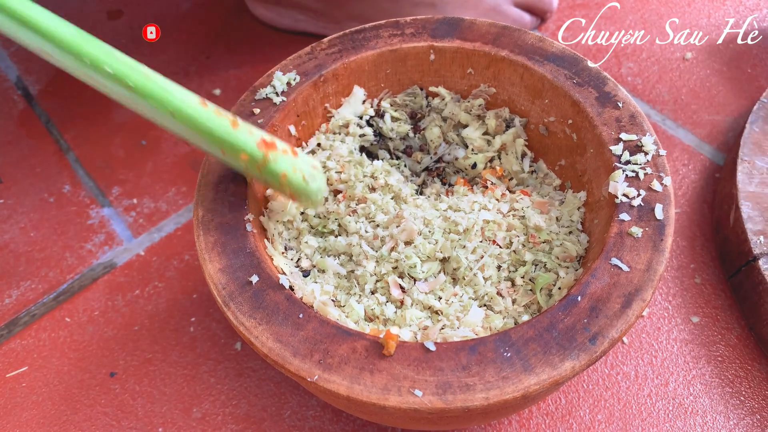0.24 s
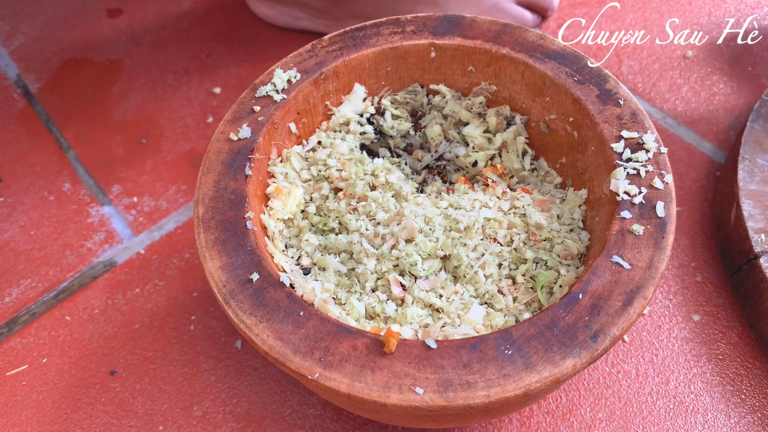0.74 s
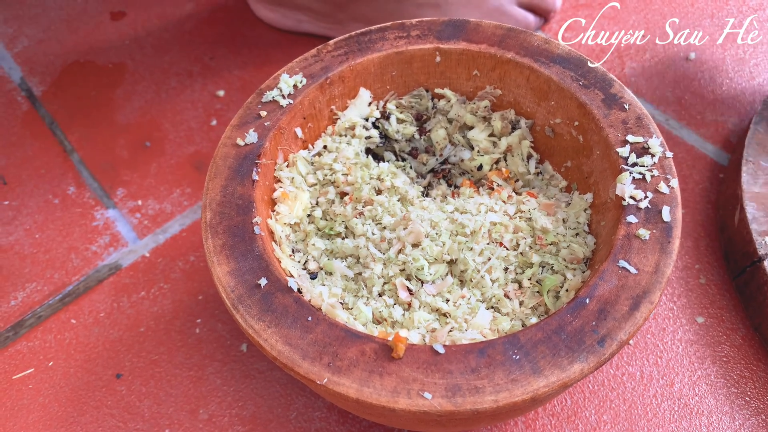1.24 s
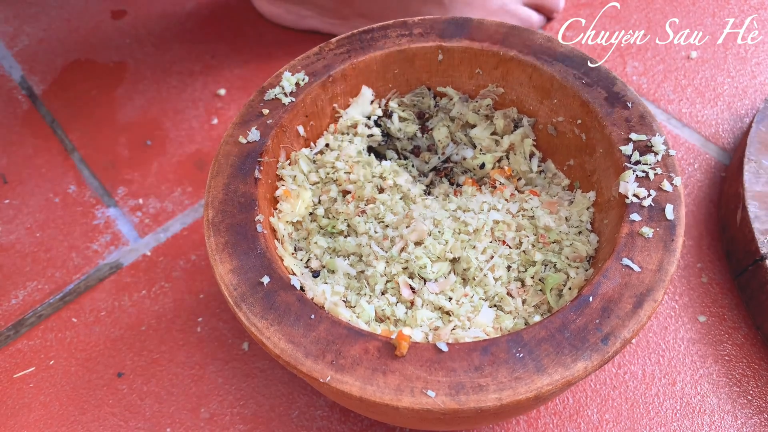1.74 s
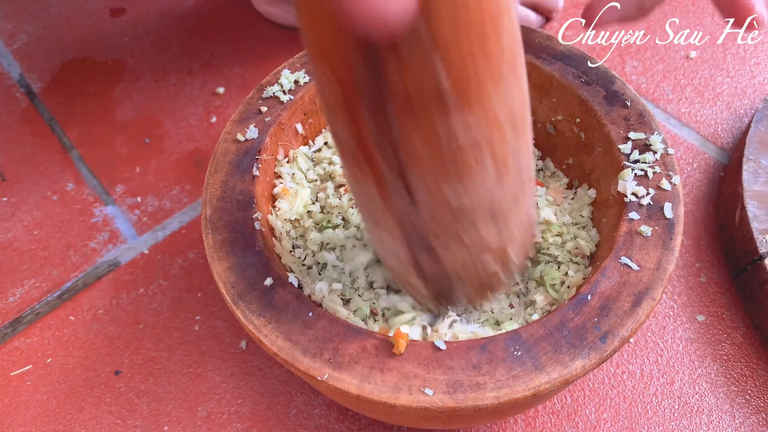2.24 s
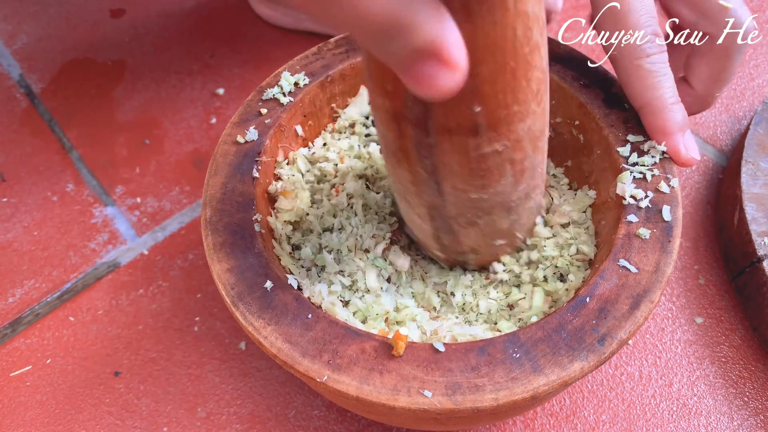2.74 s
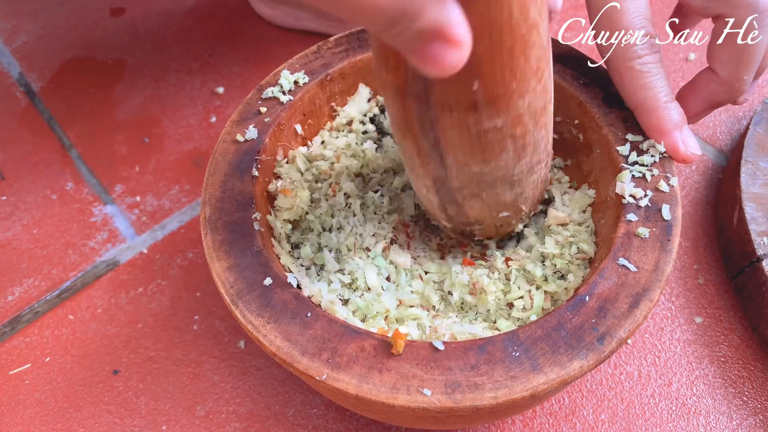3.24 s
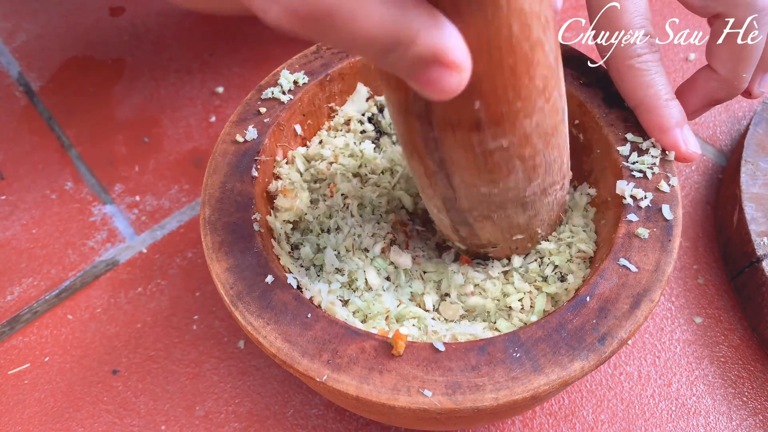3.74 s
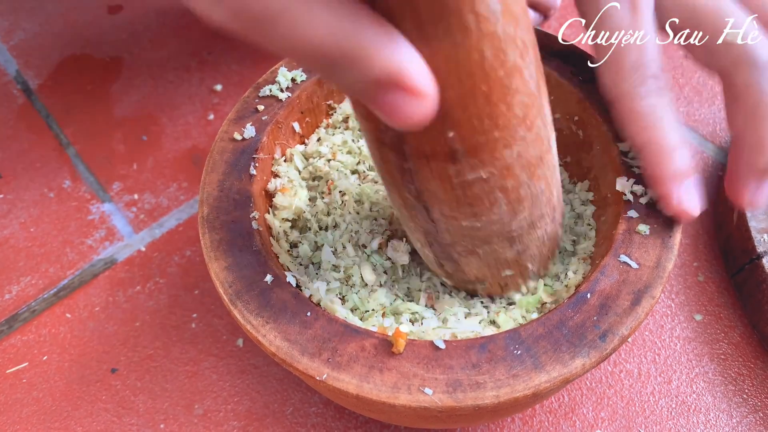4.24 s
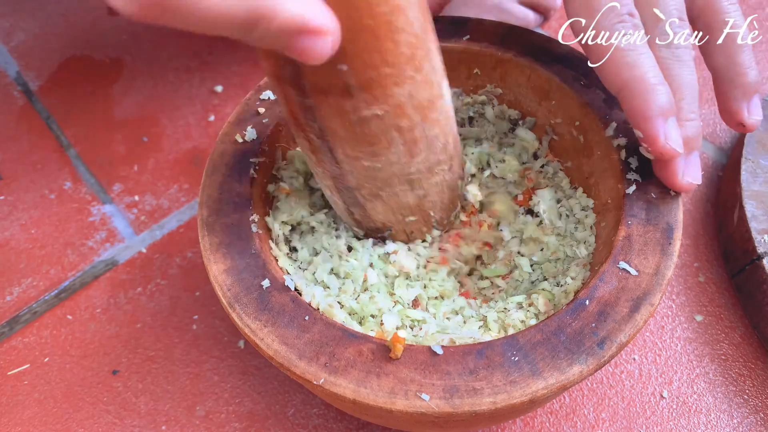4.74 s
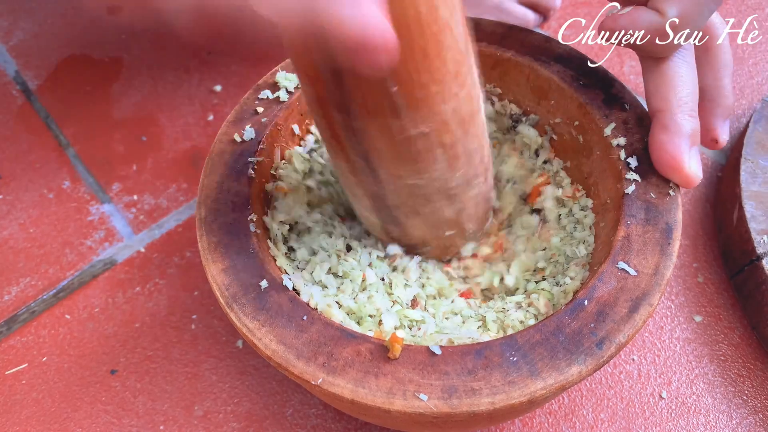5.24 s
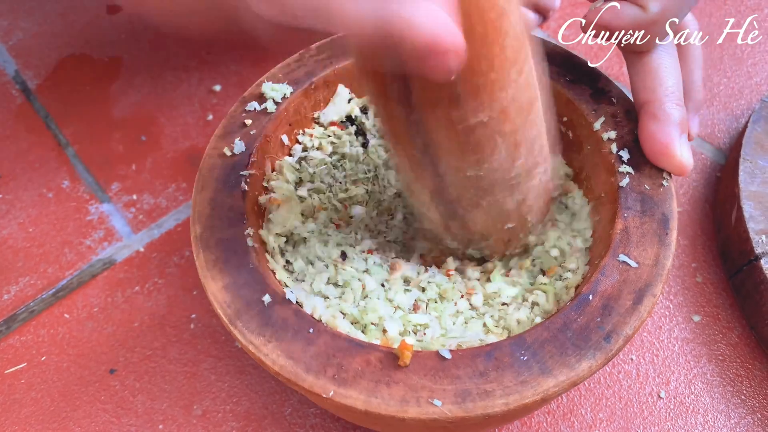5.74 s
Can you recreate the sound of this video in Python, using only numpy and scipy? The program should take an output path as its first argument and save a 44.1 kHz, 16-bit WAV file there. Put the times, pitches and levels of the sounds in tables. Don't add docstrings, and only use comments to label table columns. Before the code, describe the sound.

Moist, gritty pestle crunches about four times a second follow a small plastic clatter and board knock, with a few hard wooden knocks and faint insect whine.

```python
import sys
import numpy as np
from scipy import signal
from scipy.fft import rfft, irfft, next_fast_len
from scipy.io import wavfile
from scipy.ndimage import map_coordinates

SR = 44100
rng = np.random.default_rng(int(sys.argv[2]) if len(sys.argv) > 2 else 0)


def log_audio(samples):
    frames = np.atleast_2d(samples).T
    limited = np.clip(frames, -1, 1)
    pcm = np.round(limited * 32767).astype(np.int16)
    wavfile.write(sys.argv[1], SR, pcm)


def voltage_ratio(level):
    return 10 ** (np.asarray(level, float) / 20)


N = 263409

# peak_s, length_s, crackle_db, fizz_db
PEELS = [(0.211, 0.1, -54.5, -66.5), (0.407, 0.18, -53.5, -59), (0.686, 0.19, -55, -72.5),
         (0.907, .06, -64.5, -83), (0.974, 0.041, -58, -65), (1.119, 0.038, -80, -88),
         (1.416, 0.03, -39, -66.5), (1.449, 0.061, -50.5, -77), (1.542, 0.033, -83.5, -72),
         (1.71, 0.037, -83, -68), (1.801, 0.075, -48, -67), (1.943, 0.041, -71, -80),
         (2.226, 0.029, -73, -72.5), (2.475, 0.096, -53, -67), (2.547, 0.056, -56, -62),
         (2.63, 0.057, -49.5, -78.5), (2.78, 0.096, -48, -68), (2.906, 0.09, -52.5, -68),
         (3.048, 0.078, -61, -71.5), (4.064, 0.078, -38.5, -59.5), (4.705, 0.09, -34.5, -57),
         (4.835, 0.1374, -54, -69), (4.984, 0.086, -56, -79.5), (5.079, 0.067, -45, -68),
         (5.233, 0.048, -38, -75), (5.313, 0.075, -53.5, -72), (5.488, 0.056, -39, -73.5),
         (5.58, 0.063, -55.5, -73.5), (5.727, 0.067, -35.5, -69.5), (5.967, 0.092, -36.5, -62)]
# start_s, peak_db, centre_hz, squash_db, fizz_db
STROKES = [(1.4094, -35, 2600, 7, -35), (1.4286, -31, 2360, 7, -24), (1.4589, -25.5, 2540, -2, -37.5),
           (2.3058, -21.5, 3270, -3.5, -20), (2.5587, -32, 3040, 5, -14), (2.8135, -22, 2740, 6, -8),
           (2.9973, -46, 4230, -9, -19), (3.0754, -26, 4070, 13.5, -2), (3.3274, -24.5, 3300, 4.5, -8.5),
           (3.4112, -40, 3480, 3, -28), (3.585, -22, 3740, 4.5, -7.5), (3.839, -22, 3275, -2, -10.5),
           (4.0836, -31, 3600, 1.5, -36), (4.2443, -49.5, 3330, -20.5, -13.5),
           (4.324, -26.5, 2950, 9.5, -7.5), (4.5465, -56.5, 2380, 2, -15), (4.6004, -22, 2260, 2.5, -25),
           (4.8871, -29.5, 2660, 4.5, -20.5), (5.1425, -24.5, 3370, 0.5, -11), (5.4005, -27, 2700, 8, -22),
           (5.6491, -22, 3580, 10.5, -8), (5.8992, -17.5, 3190, 0, -12)]


def unit(x):
    return x / np.sqrt(np.mean(x ** 2) + 1e-20)


def curves(rows):
    s, *cols = np.transpose(rows)
    return [np.interp(np.arange(N) / SR, s, c) for c in cols]


def wobble(rate):
    knots = rng.standard_normal(int(N * rate / SR) + 4)
    return map_coordinates(knots, [np.arange(N) * rate / SR])


def filtered(x, response):
    m = next_fast_len(len(x) + 8192)
    return irfft(rfft(x, m) * response(np.fft.rfftfreq(m, 1 / SR)), m)[:len(x)]


def mode(f, hz, width):
    return 1j * f * width / (hz * hz - f * f + 1j * f * width)


def modal_sum(f, modes, gains):
    return sum((-1) ** k * gains[k] * mode(f, hz, width) for k, (hz, width, _) in enumerate(modes))


def add(track, s, sound):
    part = track[round(s * SR):][:len(sound)]
    part += sound[:len(part)]


def roomed(sound, wet_db, t60):
    t = np.arange(len(sound)) / SR
    noise = rng.standard_normal(len(t))
    low = filtered(noise, lambda f: 1 / (1 + (f / 2200) ** 4))
    decay = voltage_ratio(-60 * t / t60)
    tail = low * decay + (noise - low) * voltage_ratio(-60 * t / (0.98 * t60))
    tail = tail * (1 - np.exp(-t / 0.0015))
    return sound + voltage_ratio(wet_db) * signal.fftconvolve(sound, tail / np.linalg.norm(decay))[:len(t)]


def grit(size, spiky_db):
    noise = rng.standard_normal(size)
    grains = rng.standard_normal(size // 8 + 1).repeat(8)[:size]
    return unit(noise * voltage_ratio(np.clip(spiky_db, 0, 7) * grains))


def room_tone():
    # pitch_hz, level_db (per Hz)
    air_spectrum = [(125, -9.5), (160, -30.5), (229, -2.5), (317, -5), (449, -5), (950, -8.5), (2090, -19),
                    (3130, -16.5), (5260, -20.5), (6300, -15), (7200, -14.5), (9000, -21), (11000, -30),
                    (13500, -32.5), (14800, -45.5)]
    # pitch_hz, level_db
    hum_tones = [(401, -65.5), (287, -79)]
    air_hz, air_db = np.transpose(air_spectrum)
    noise = rng.standard_normal(N) * voltage_ratio(1.1 * wobble(10.0))
    air = filtered(noise, lambda f: voltage_ratio(np.interp(np.log(f + 1), np.log(air_hz), air_db)))
    t = np.arange(N) / SR
    hum = np.zeros(N)
    for hz, db in hum_tones:
        hum += voltage_ratio(db - 1.5 + 1.3 * wobble(8.9)) * np.sin(2 * np.pi * hz * t + 0.51 * wobble(1.1))
    return voltage_ratio(-59.5) * unit(air) + hum


def insect():
    # start_s, tenth_overtone_db, lean_db (of its neighbours towards the lower one)
    song = [(0.05, -64.5, 3), (.5, -69, 8), (.7, -62, 11), (.95, -76, -1), (1.4, -69, 9), (1.85, -76, 2),
            (2.38, -65.5, -5), (2.43, -51, 1), (2.49, -65.5, 0), (2.9, -69.5, 1.5), (3.13, -63.5, -1),
            (3.8, -75.5, 1), (4.2, -58.5, 3), (4.46, -48.5, 0.5), (4.56, -55.5, 2), (4.63, -69, 4),
            (5.1, -64.5, 3.5), (5.6, -73, 6.5)]
    # start_s, four_click_db, two_click_db
    unevenness = [(0, -71, -79), (.7, -74, -79.5), (1.1, -71, -75), (1.72, -82, -77), (1.85, -78, -71.5),
                  (2.2, -100, -71.5), (2.5, -100, -102)]
    # pitch_hz, level_db
    wing = [(5300, -9.5), (5800, -5.5), (6100, 2), (6450, 1), (6750, -2.5), (7050, -3.5), (7500, -16)]
    # start_s, rate_hz
    click_rate = [(0, 624.6), (1, 624.5), (1.9, 623.6), (3, 625.4), (4.45, 627.8), (5.5, 628.7), (6, 628.8)]
    # centre_s, length_s, multiple (of the click rate), level_db
    standouts = [(.25, .5, 10.75, 5), (1.2, .55, 10.25, 9), (1.88, .22, 9.5, 6), (.05, .2, 9.5, 8),
                 (.9, .9, 11.25, 3)]
    t = np.arange(N) / SR
    tenth_db, lean_db = curves(song)
    flank_db, = curves([(0.98, -79), (1.96, -70)])
    ninth_db, eleventh_db = flank_db + lean_db, flank_db - lean_db
    four_db, two_db = curves(unevenness)
    depth, = curves([(1.75, .12), (1.9, .72)])
    depth = np.clip(depth - .022 * np.maximum(tenth_db + 63, 0), 0, .9)
    calm, = curves([(4.7, .85), (5.1, .25)])
    rate = curves(click_rate)[0]
    phase = 2 * np.pi * np.cumsum(rate + 0.24 * wobble(4.4)) / SR
    beat = 2 * np.pi * np.cumsum(27 + 1.2 * wobble(2.5)) / SR
    phase = phase + .11 * depth * np.sin(beat)

    def line(order, db):
        return voltage_ratio(db + wobble(6)) * np.sqrt(2) * np.sin(order * phase + rng.uniform(0, 2 * np.pi))

    def throb(share, lag):
        swing = share * depth
        return (1 + swing * np.sin(beat - lag)) / np.sqrt(1 + swing ** 2 / 2)

    out = line(9, ninth_db) * throb(calm, 1.2)
    out = out + line(10, tenth_db) * throb(.95, 1.6)
    out = out + line(11, eleventh_db) * throb(.9, 2.0)
    out = out + line(12, eleventh_db - 8) * throb(1.1, .8)
    wing_hz, wing_db = np.transpose(wing)
    for quarter in range(35, 48):
        if quarter % 4 == 0:
            continue
        colour_db = np.interp(quarter / 4 * rate[0], wing_hz, wing_db)
        for s, length, order, db in standouts:
            if order == quarter / 4:
                colour_db = colour_db + db * np.exp(-(2 * (t - s) / length) ** 4)
        uneven_db = four_db if quarter % 2 else two_db
        out = out + line(quarter / 4, colour_db + 2 * wobble(3) + uneven_db)
    return out


def stickiness():
    t = np.arange(N) / SR
    rest_db, spray_db = np.array([[-76], [-82]]), np.array([[-6.5], [-11]])
    gains = voltage_ratio(rest_db + np.array([3 * wobble(3.9), 5 * wobble(16)]))
    for s, length, crackle_db, fizz_db in PEELS:
        fall_db = 20 * (2 * (t - s) / length) ** 2
        gains = gains + voltage_ratio(np.array([[crackle_db], [fizz_db]]) - fall_db)
    for s, db, _, _, fizz_db in STROKES:
        u = np.maximum(t - s, 0)
        spray = (1 - np.exp(-u / 0.018)) * voltage_ratio(db + fizz_db - 60 * u / 0.15)
        gains = gains + voltage_ratio(spray_db) * spray
    return gains


def sticky():
    low_shares = [.3, .3, 0.55, 0.57, 0.77, 0.61, 0.72, .5, .5, 0.46, 0.24, 0.42, .5, .3, 0.69, .4, 0.19,
                  0.17, .5, .6, .75, 0.77, 0.71, 0.62, 0.67, 0.51, 0.61, 0.55, 0.65, .6]
    crackle_gain, fizz_gain = stickiness()
    bits = grit(N, 4.5) * voltage_ratio(2.2 * wobble(150))
    lean = curves([(row[0], share) for row, share in zip(PEELS, low_shares)])[0]
    lean = np.clip(lean, 0, 1)

    def zone(hz):
        return unit(filtered(bits, lambda f: mode(f, hz, 380) * mode(f, 8300, 1900) ** 3))

    low, high = zone(7850), zone(8800)
    fine = grit(N, 3) * voltage_ratio(9 * np.tanh(2 * wobble(220) + .5))
    fizz = unit(filtered(fine, lambda f: mode(f, 13300, 2300) ** 3))
    return voltage_ratio(-4.0) * crackle_gain * (lean * low + (1 - lean) * high) + fizz_gain * fizz


def thump(pitch_hz, cycles, t, order):
    u = t * pitch_hz / cycles
    push = -np.sin(2 * np.pi * pitch_hz * t) * (u * np.exp(1 - u)) ** 3
    top_hz = max(1480, 1.5 * pitch_hz)
    push = signal.sosfilt(signal.butter(5, top_hz, fs=SR, output="sos"), push)
    return filtered(push, lambda f: (1j * f / (270 + 1j * f)) ** order)


def thumps():
    # start_s, peak_db, pitch_hz, cycles, room_db
    dull_blows = [(0.11, -28.5, 620, 0.61, 0), (0.333, -32.5, 607, 0.53, 0.5), (0.353, -43, 710, 0.28, 4.5),
                  (0.964, -35.5, 296, 0.98, -6), (0.984, -39.5, 292, 1.36, -19.5),
                  (1.337, -50, 419, 0.56, 0), (1.395, -33, 306, 1.5, 1), (1.715, -49, 305, 5.1, 0.5),
                  (1.804, -46.5, 306, 4.5, -2), (2.329, -37, 444, 1.1, -2), (2.598, -58.5, 413, 0.6, 12.5),
                  (2.787, -46.5, 1200, 0.33, 13), (2.816, -31.5, 1260, 1.27, -6),
                  (2.815, -33.5, 473, 0.95, -1.5), (2.831, -38.5, 316, 1.9, -7), (3.074, -31, 594, 1.22, 1),
                  (3.1, -44, 800, 0.88, 2), (4.424, -32.5, 313, 0.67, -6), (4.443, -41.5, 450, 0.72, -7.5),
                  (4.457, -46.5, 400, 0.8, -6.5), (4.891, -36.5, 450, 0.54, -1),
                  (5.142, -37, 1100, 1.24, 3), (5.17, -52.5, 990, 6, 1), (5.165, -53, 522, 3.1, -7),
                  (5.648, -29, 734, 1.1, -2.5), (5.657, -27.5, 474, 0.64, -13),
                  (5.671, -33.5, 330, 0.68, 1.5), (4.328, -45.5, 600, 0.77, 4.5),
                  (5.9, -41, 763, 0.42, 2.5)]
    # start_s, peak_db, pitch_hz, cycles, room_db
    wood_blows = [
        (3.3386, -3.5, 849, 0.72, -9),
        (3.5945, 0, 870, 0.63, -11),
        (4.5996, 6, 810, 0.9, -11),
        (4.617, -8.5, 900, 0.63, 2.5),
        (4.65, -1, 705, 0.51, -9.5),
    ]
    # pitch_hz, width_hz, level_db
    bowl_modes = [(301, 18, -6), (400, 30, -14), (544, 24, -9), (605, 24, -12), (670, 24, -7),
                  (765, 26, -8), (856, 26, -4), (985, 14, -12), (1105, 16, -5), (1205, 10, -9)]
    # delay_s, level_db
    reflections = [(.0022, -13), (.0045, -34.5), (.0095, -29), (.017, -20.5), (.025, -28), (.038, -30)]
    out, t = np.zeros(N), np.arange(SR // 3) / SR
    for s, db, pitch_hz, cycles, wet_db in dull_blows:
        t60 = max(.04, 0.12 + .004 * wet_db)
        add(out, s + 0.0016, voltage_ratio(db + 8.5) * roomed(thump(pitch_hz, cycles, t, order=3), wet_db, t60))
    t60 = 0.15
    bowl_gains = [voltage_ratio(db + 6.5) for _, _, db in bowl_modes]
    for s, db, pitch_hz, cycles, wet_db in wood_blows:
        push = -thump(pitch_hz, cycles, t, order=1)
        air = roomed(filtered(push, lambda f: mode(f, 1160, 110)), 4.9, 0.3)
        walls = filtered(push, lambda f: sum(voltage_ratio(g) * np.exp(-2j * np.pi * f * d) for d, g in reflections))
        ring = filtered(push, lambda f: modal_sum(f, bowl_modes, bowl_gains))
        blow = roomed(push, wet_db, t60) + walls + voltage_ratio(-19) * air + voltage_ratio(-6.5) * roomed(ring, -4, t60)
        add(out, s - .0003, voltage_ratio(db + 3) * blow)
    return out


def rattle(hits, modes, dull_hz, top_hz, scuff, wet_db, t60, linger):
    out, t = np.zeros(N), np.arange(SR // 3) / SR
    linger_hz, linger_width_hz, linger_db, linger_t60 = linger
    for s, db, bright_db, spot_hz in hits:
        soft = signal.butter(6, top_hz * voltage_ratio(.13 * min(bright_db, 0)), fs=SR, output="sos")
        blow = signal.sosfilt(soft, np.abs(rng.standard_normal(len(t))) * np.exp(-t / scuff))
        gains = []
        for hz, _, mode_db in modes:
            near_db = 7 * np.exp(-(np.log2(hz / spot_hz) / .2) ** 2)
            tilt_db = bright_db * max(0, np.log2(hz / dull_hz))
            gains.append(voltage_ratio(mode_db + near_db + rng.normal(0, 1.5) + tilt_db))
        ring = filtered(blow, lambda f: modal_sum(f, modes, gains))
        ring = ring / np.abs(ring).max()
        hollow = filtered(ring, lambda f: mode(f, linger_hz, linger_width_hz))
        tail = voltage_ratio(linger_db) * roomed(hollow, 7.9, linger_t60)
        add(out, s, voltage_ratio(db) * (roomed(ring, wet_db, t60) + tail))
    return out


def spoon():
    # start_s, peak_db, brightness_db, favoured_hz
    bounces = [(0.4066, 0, 5.5, 1600), (0.4135, -13.5, -13, 1530), (0.4225, -8, -5, 1220),
               (0.434, -12.5, -9, 2040), (0.439, -24, 0, 2040), (0.4527, -13.5, -21, 1500),
               (0.459, -15.5, -24, 1200), (0.467, -15.5, -11, 1300), (0.476, -20, -20, 1500),
               (0.483, -22.5, -12, 1300), (0.498, -25, -28, 1200), (0.507, -36, -31, 1150),
               (0.512, -23, -42, 700), (0.5205, -20.5, -24, 1900), (0.524, -37, -28, 1540),
               (0.528, -20.5, -23, 1000), (0.534, -31, -24, 1300), (0.541, -24, -20, 900),
               (0.564, -42, -22, 1400)]
    # pitch_hz, width_hz, level_db
    spoon_modes = [(330, 80, -27), (481, 48, -7.5), (720, 160, -1), (965, 60, -4), (1166, 97, 4),
                   (1344, 200, 0.5), (1530, 95, 6), (1758, 180, -2.5), (2040, 68, 7.5), (2443, 350, -5),
                   (2900, 300, -5.5), (3300, 640, -12), (3800, 338, -18)]
    return rattle(bounces, spoon_modes, dull_hz=1530, top_hz=4100, scuff=.00005, wet_db=-4.5, t60=0.13,
                  linger=(1448, 299, -18, 0.42))


def squeaks():
    # start_s, length_s, start_hz, end_hz, level_db
    glides = [
        (.55, .07, 3900, 3800, -65),
        (1.0, .15, 4050, 3650, -60),
        (1.87, .07, 2280, 2330, -59),
        (2.74, .08, 4300, 3800, -59),
        (2.83, .09, 3700, 3650, -59),
        (3.35, .12, 3950, 3750, -60),
        (4.92, .07, 3050, 3000, -61),
        (5.57, .05, 1560, 1540, -62),
    ]
    out = np.zeros(N)
    for s, length, start_hz, end_hz, db in glides:
        size = int(length * SR)
        envelope = np.hanning(size) * (wobble(350)[:size] + 0.47)
        phase = 2 * np.pi * np.cumsum(np.linspace(start_hz, end_hz, size)) / SR
        add(out, s, voltage_ratio(db + 2.5) * envelope * np.sin(phase))
    return out


def board():
    # start_s, peak_db, brightness_db, favoured_hz
    rocking = [(1.403, -34, -12.5, 330), (1.41, -24.5, -6.5, 564.5), (1.424, -24, 1.5, 330),
               (1.435, -29, 6, 611), (1.458, -8.5, 0, 400), (1.4625, -12.5, 3, 467),
               (1.4745, -14, -13, 470), (1.479, -13, -13.5, 470), (1.497, -28.5, -11, 471.2),
               (1.512, -18, -5.5, 470), (1.542, -18.5, -2, 610), (1.551, -21.5, -6, 610),
               (1.561, -27.5, -3, 400), (1.585, -38, 0, 480), (1.604, -32.5, -6, 400),
               (1.629, -45, -2, 456)]
    # pitch_hz, width_hz, level_db
    board_modes = [(113.7, 18, -7.5), (266.4, 37, -9), (330, 140, -9.5), (400, 59.6, -6.5), (475, 34, 3.5),
                   (610, 59, -4.5), (745, 37, -10.5), (980, 106, -13), (1200, 200, -23), (1600, 76, -12),
                   (2530, 300, -55.5)]
    return rattle(rocking, board_modes, dull_hz=573, top_hz=2244, scuff=0.0003, wet_db=-3.0, t60=0.12,
                  linger=(285.5, 42.5, -6, 0.37))


def crush():
    # start_s, peak_db, centre_hz, squash_db, fizz_db
    hard_grains = [
        (4.141, -30, 3015, -24.5, -21),
    ]
    # start_s, squash_hz, low_hz, middle_hz, high_hz
    paste_cavities = [(1.4083, 1550, 2540, 2780, 3600), (1.4286, 1130, 2380, 3280, 3600),
                      (1.4589, 944, 2310, 3000, 3800), (2.3052, 1550, 2840, 3110, 4250),
                      (2.5596, 1920, 2400, 3204, 3450), (2.815, 1470, 2490, 3460, 3900),
                      (2.9966, 1130, 2770, 3380, 4460), (3.0764, 1420, 2360, 3440, 3820),
                      (3.3273, 1110, 2960, 3150, 3600), (3.4114, 940, 2750, 2800, 3960),
                      (3.5845, 1180, 2335, 3010, 3620), (3.8395, 1500, 2575, 3260, 3650),
                      (4.0835, 1744, 2680, 3440, 3800), (4.2443, 1226, 2540, 3190, 3760),
                      (4.3237, 1453, 2320, 3290, 3340), (4.5461, 1070, 2570, 3140, 4070),
                      (4.6005, 962, 2380, 2850, 4020), (4.8871, 1290, 2430, 3240, 3660),
                      (5.1419, 1117, 2450, 3190, 3530), (5.3992, 1443, 2844, 3026, 3690),
                      (5.6501, 1170, 2520, 3435, 3570), (5.8984, 1200, 2310, 3160, 3470)]
    lead_s, sink_s = .008, 0.0042
    out, t = np.zeros(N), np.arange(SR // 5) / SR
    strokes = [(*row, .52, own[1:]) for row, own in zip(STROKES, paste_cavities)]
    strokes += [(*row, 0.22, [row[2]] * 2) for row in hard_grains]

    v = np.maximum(t - lead_s, 0)
    lead = voltage_ratio(-23) * np.exp(-np.abs(t - lead_s) / 0.0035)
    bite = 0.54 * (v / sink_s * np.exp(1 - v / sink_s)) ** 2.5
    shape = lead + bite + 0.048 * (1 - np.exp(-v / .002)) * voltage_ratio(-60 * v / 0.097)
    settling = voltage_ratio(-14.5) * (1 - np.exp(-v / 0.0055)) * np.exp(-(v / 0.04) ** 3)
    u = np.maximum(v - sink_s / 2, 0)

    def bowl(f):
        return 1 / (1 + (f / 5300) ** 12)

    def cavities(f, hz, spread, chance):
        return sum(mode(f, c, .02 * c) for c in np.r_[hz, hz * 2 ** (spread * chance)])

    def pop(hz):
        return np.sin(2 * np.pi * hz * u) * voltage_ratio(-60 * u / 0.015) * (1 - np.exp(-u / 0.0013))

    for s, db, centre_hz, squash_db, fizz_db, breadth, (squash_hz, *pockets_hz) in strokes:
        chance = rng.standard_normal((2, 12))

        def body_response(f):
            own = sum(voltage_ratio(8.5) * mode(f, hz, 0.049 * hz) for hz in pockets_hz)
            ringing = cavities(f, centre_hz, breadth, chance[0]) + .4 + own
            return ringing * mode(f, centre_hz, 1.4 * breadth * centre_hz) ** 2 * bowl(f)

        def squash_response(f):
            own = 0.43 * mode(f, squash_hz, .12 * squash_hz)
            ringing = cavities(f, squash_hz, 0.33, chance[1, :5]) + own + 0.42
            return ringing * mode(f, squash_hz, 900)

        body = unit(filtered(grit(len(t), 5.5), body_response))
        squash = unit(filtered(grit(len(t), 1.3), squash_response))
        fizz = filtered(grit(len(t), 1.5), lambda f: mode(f, 8500, 2800) ** 2 - 0.5 * mode(f, 13100, 2200) ** 2)
        trickle = unit(filtered(grit(len(t), 9.6), lambda f: mode(f, 5400, 4800) ** 2 * bowl(f)))
        burst = (shape + settling) * (body + voltage_ratio(squash_db - 5.0) * squash)
        burst = burst + (0.47 * shape + 1.87 * settling) * voltage_ratio(fizz_db) * unit(fizz)
        pops = sum(abs(mode(hz, centre_hz, breadth * centre_hz)) * pop(hz) for hz in pockets_hz)
        pops = pops + voltage_ratio(squash_db - 0.5) * pop(squash_hz)
        burst = burst + voltage_ratio(-9) * pops + 1.2 * breadth * settling * trickle
        burst = filtered(burst, lambda f: 1 - 0.46 * mode(f, 2150, 68))
        add(out, s - lead_s - .003, voltage_ratio(db - 9.0) * roomed(burst, wet_db=-15.5, t60=0.19))
    return out


def snaps():
    # start_s, peak_db
    wet_snaps = [(2.3629, -59), (2.5225, -55), (2.5355, -47), (2.5491, -41), (2.6781, -62.5),
                 (2.744, -61.5), (2.7639, -47), (2.9989, -65.5), (3.3834, -67), (3.4883, -62),
                 (3.5297, -58.5), (3.5806, -30), (3.5861, -26.5), (4.0291, -49.5), (4.0575, -47.5),
                 (4.3051, -49), (4.4631, -53), (4.6891, -62.5), (5.2932, -62)]
    out, t = np.zeros(N), np.arange(SR // 50) / SR
    for s, db in wet_snaps:
        noise = rng.standard_normal(len(t)) * voltage_ratio(-60 * t / 0.0068)
        tick = filtered(noise, lambda f: mode(f, 13200, 2200) ** 2)
        add(out, s, voltage_ratio(db - 4.5) * tick / np.abs(tick).max())
    return out


def scene():
    background = room_tone() + insect()
    handling = spoon() + squeaks() + board()
    pounding = sticky() + thumps() + crush() + snaps()
    return (background + handling + pounding)[None]


def roll_off(x):
    return signal.sosfilt(signal.butter(12, 14990, fs=SR, output="sos"), x)


def record(dry):
    x = signal.sosfilt(signal.butter(9, 205, "high", fs=SR, output="sos"), dry)
    leak = signal.sosfilt(signal.butter(2, [100, 150], "band", fs=SR, output="sos"), dry)
    x = x + voltage_ratio(-26) * leak
    x = signal.sosfilt(signal.butter(26, 14250, fs=SR, output="sos"), x)
    x = x / (1 + np.abs(x) ** 30) ** (1 / 30)
    return roll_off(x)


dry = scene()
out = record(dry)
log_audio(out)
```